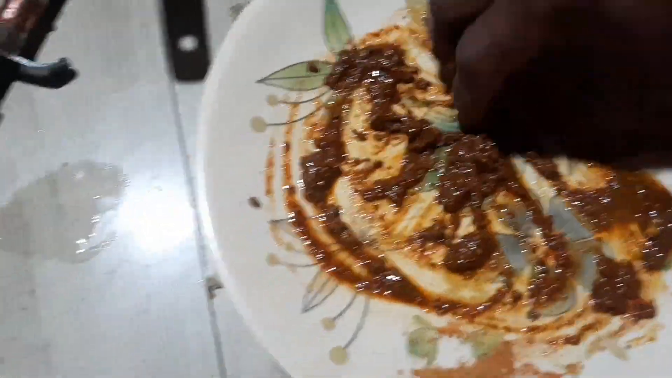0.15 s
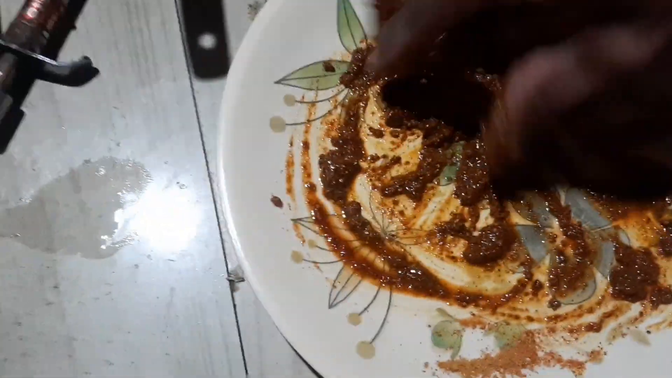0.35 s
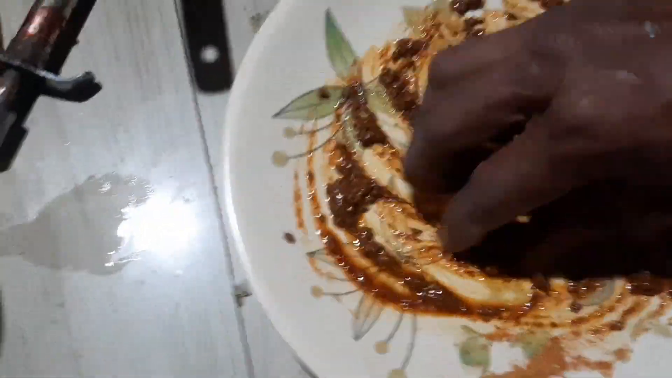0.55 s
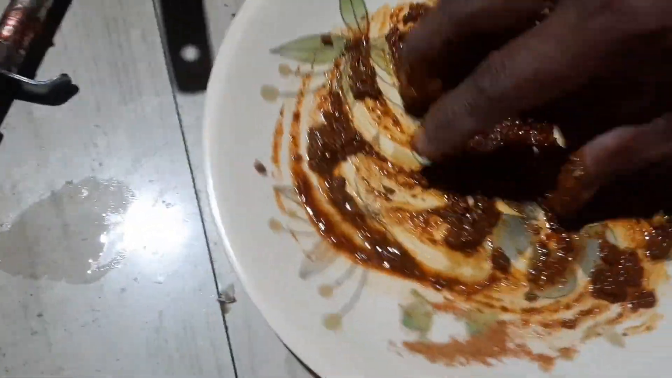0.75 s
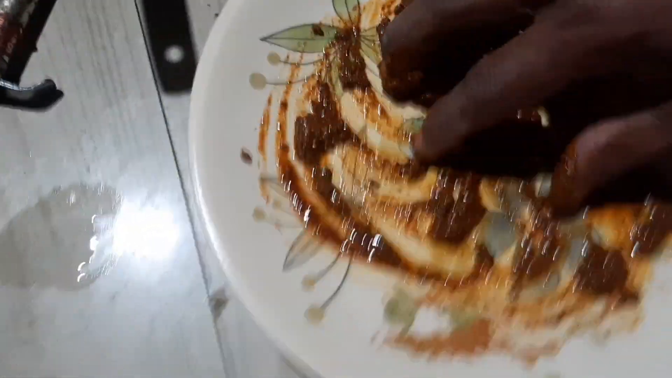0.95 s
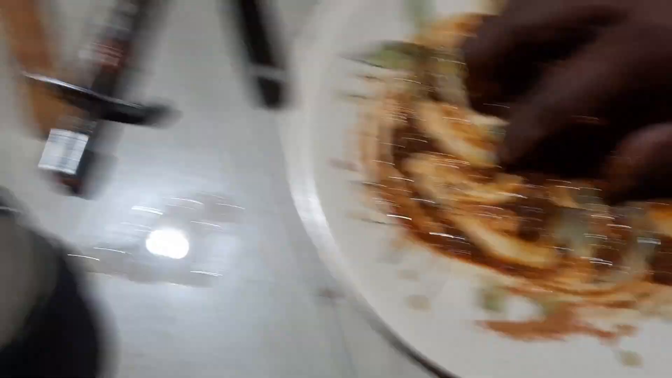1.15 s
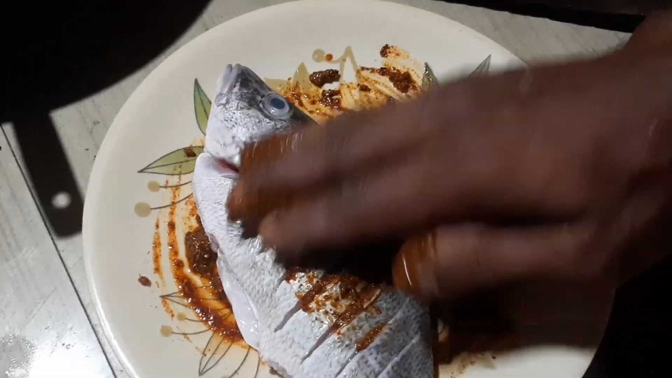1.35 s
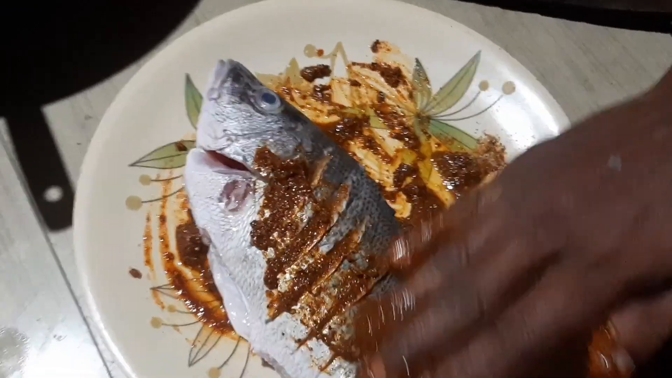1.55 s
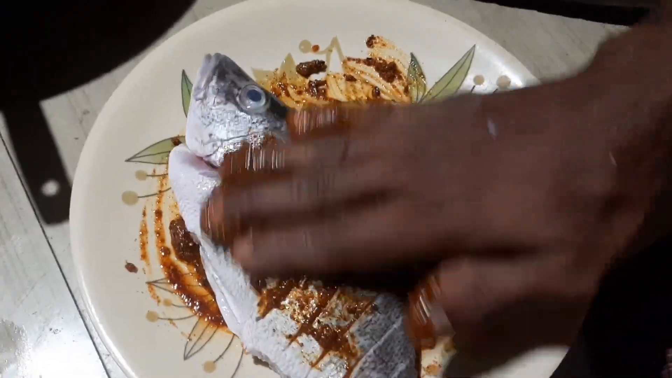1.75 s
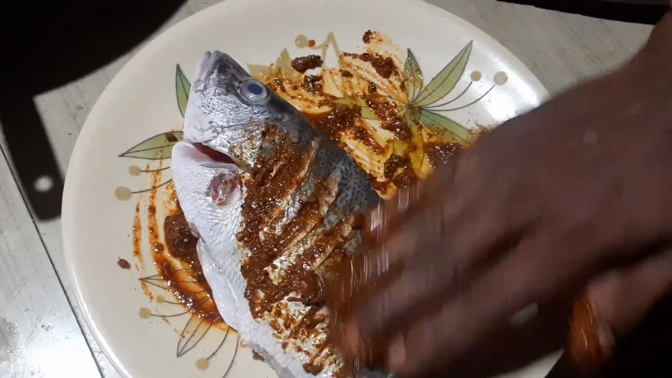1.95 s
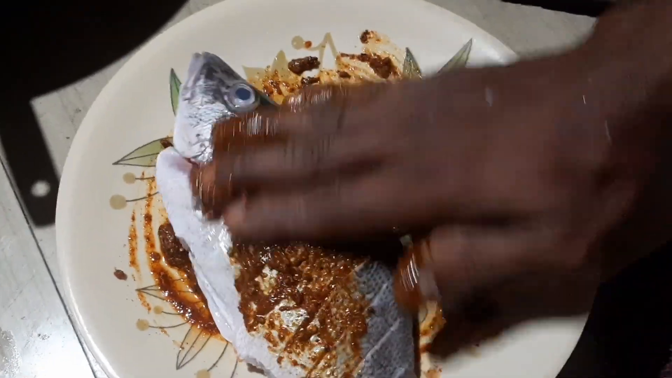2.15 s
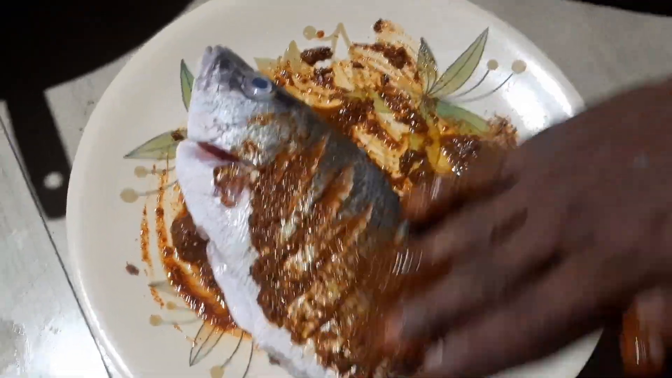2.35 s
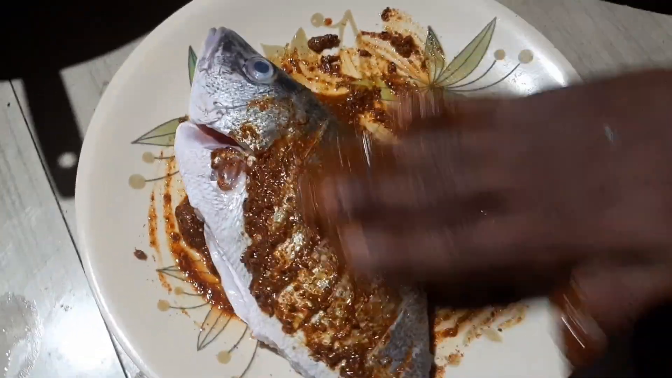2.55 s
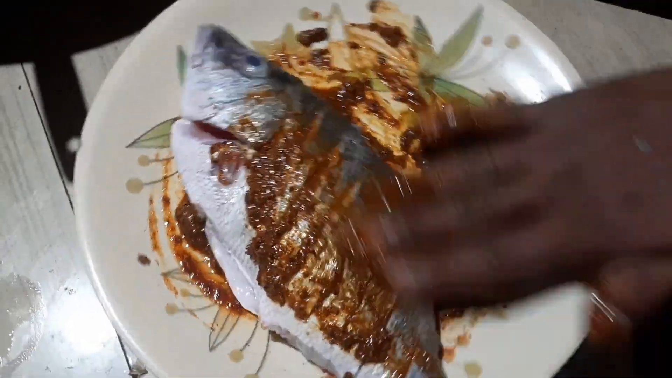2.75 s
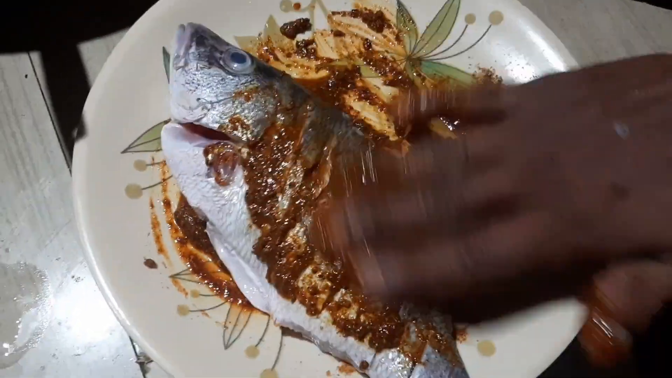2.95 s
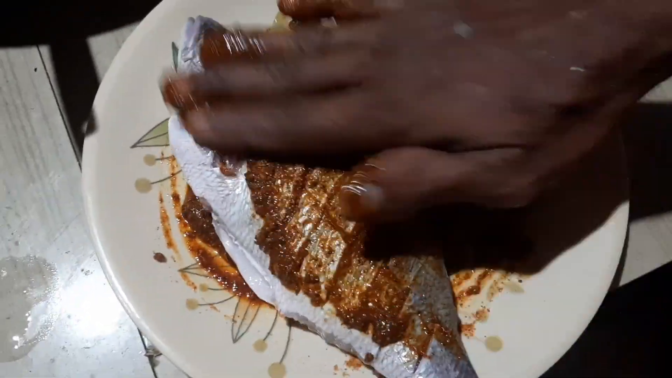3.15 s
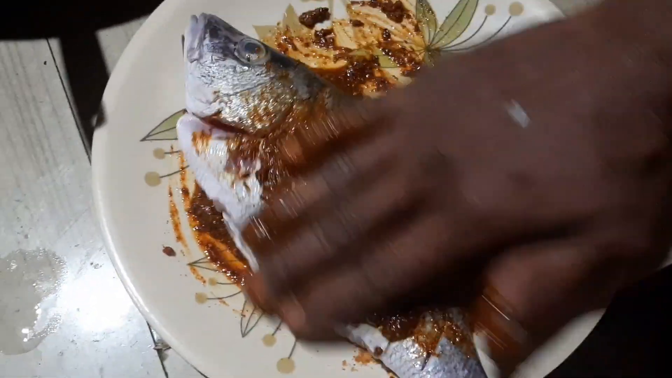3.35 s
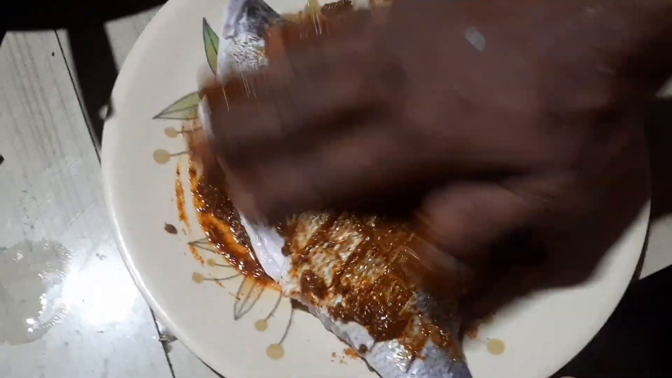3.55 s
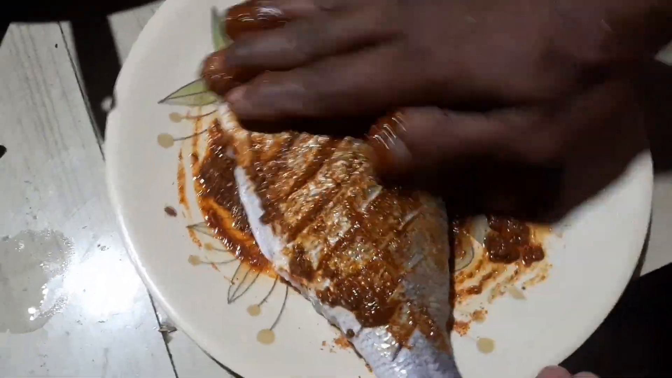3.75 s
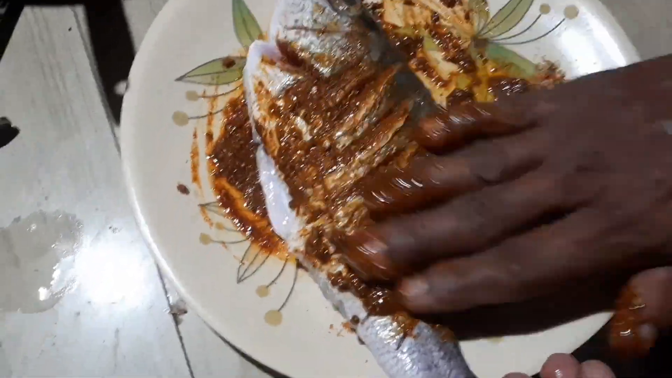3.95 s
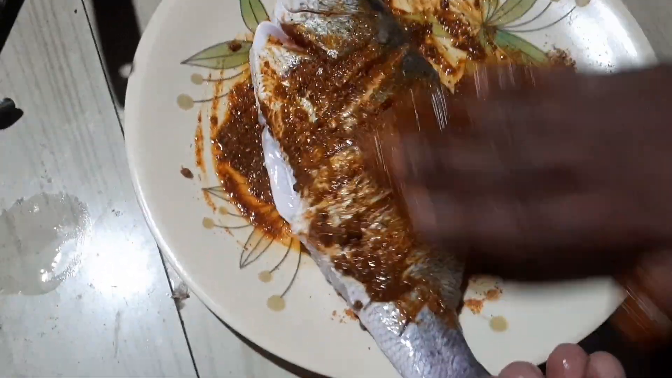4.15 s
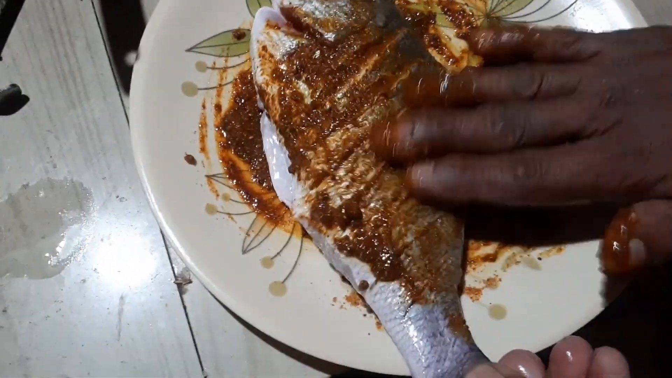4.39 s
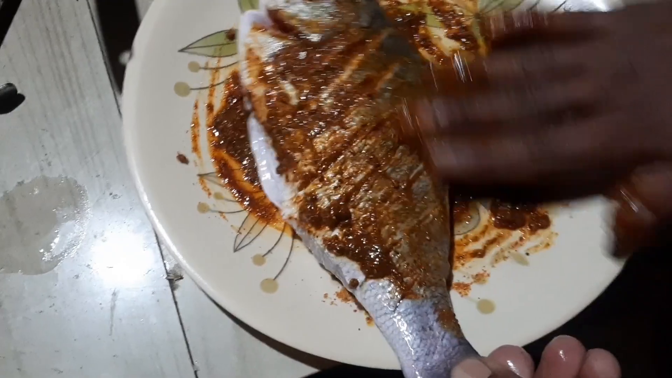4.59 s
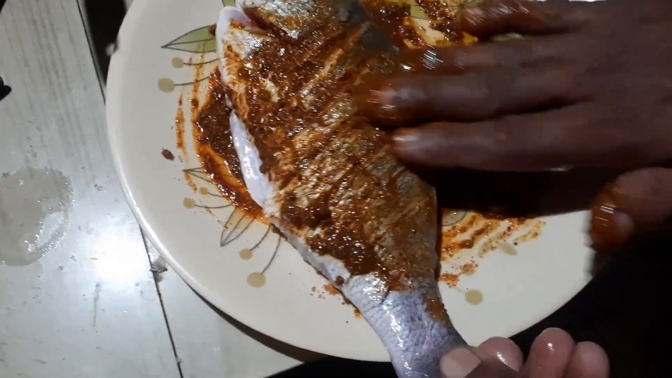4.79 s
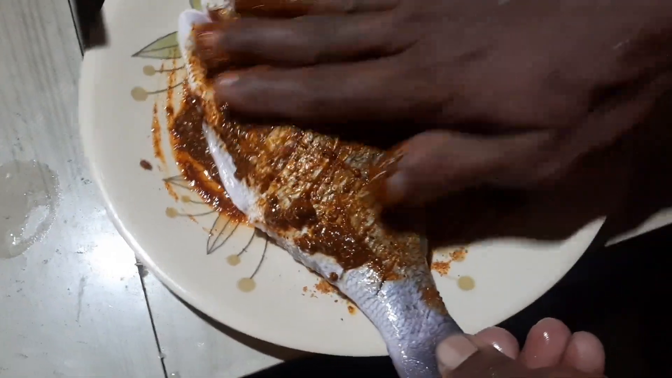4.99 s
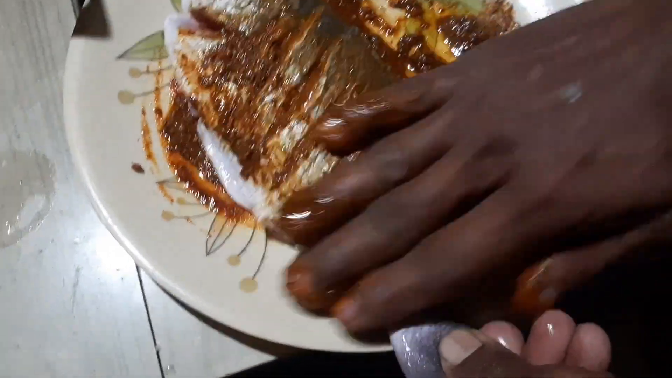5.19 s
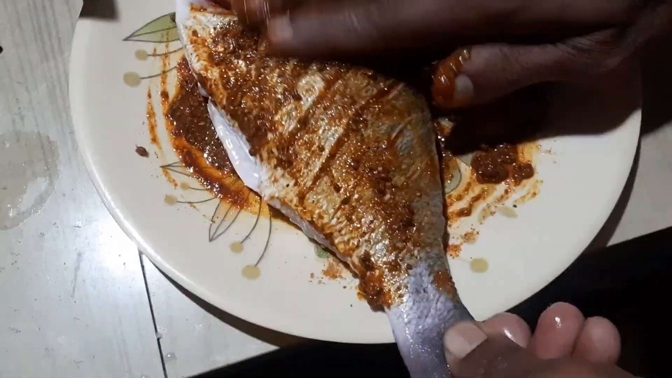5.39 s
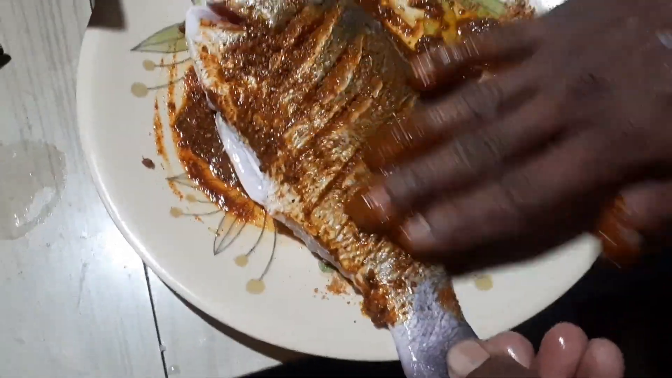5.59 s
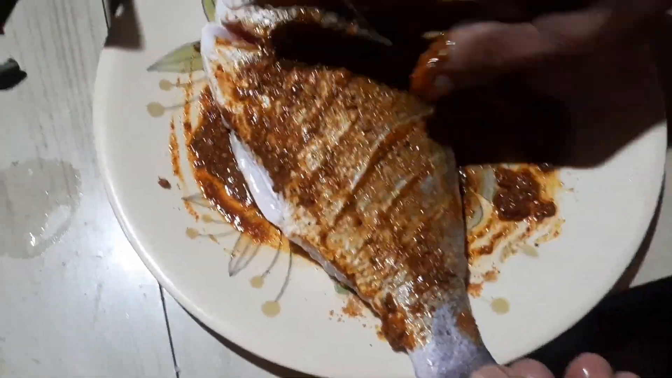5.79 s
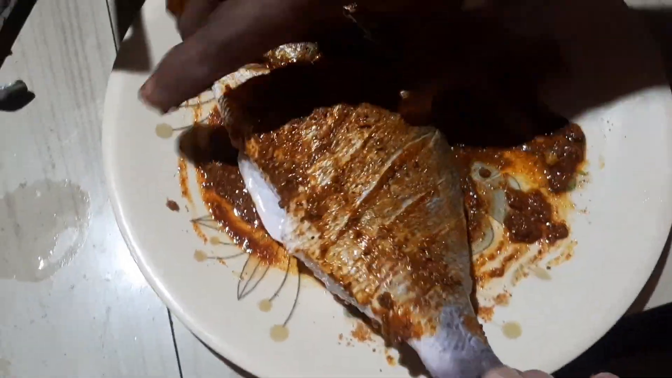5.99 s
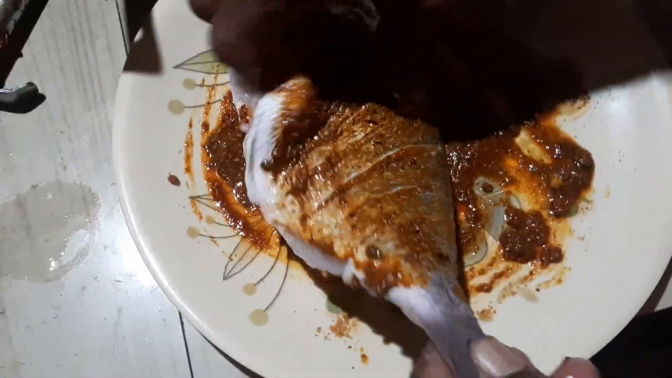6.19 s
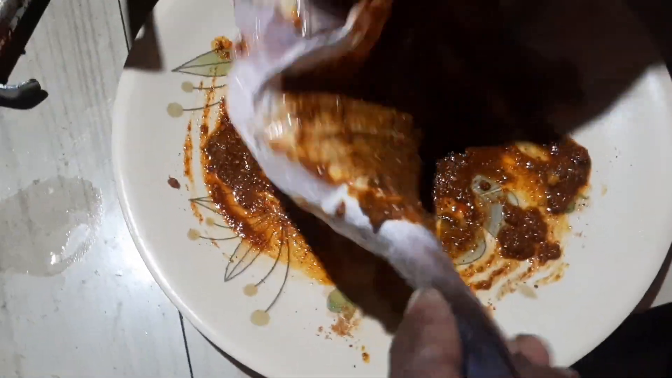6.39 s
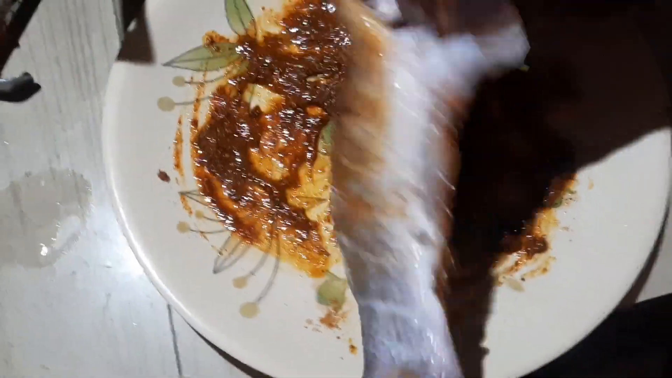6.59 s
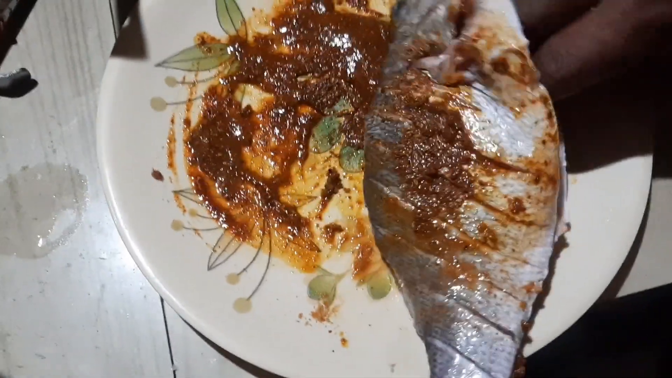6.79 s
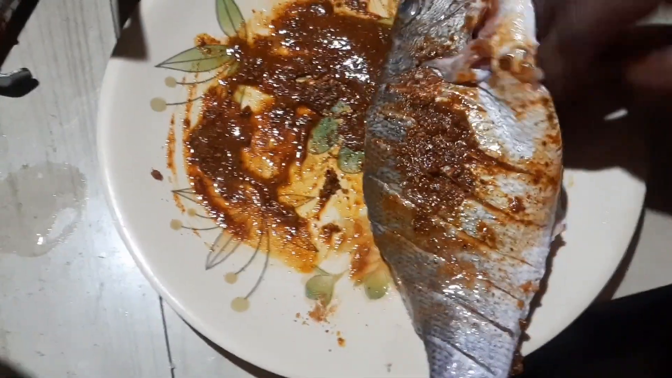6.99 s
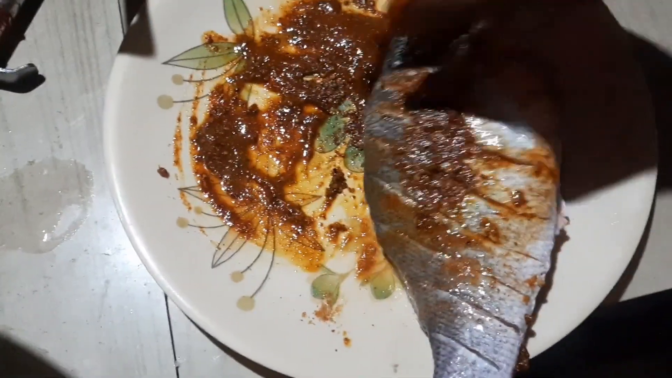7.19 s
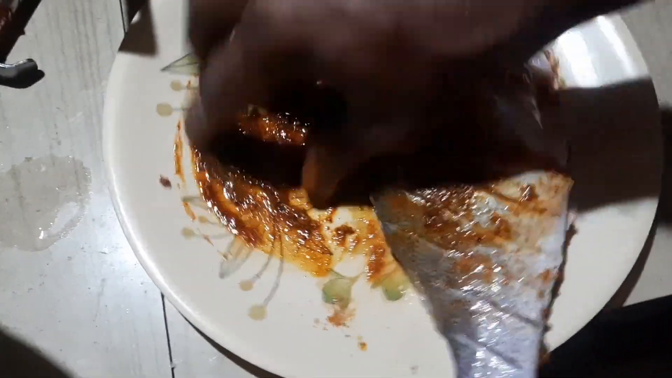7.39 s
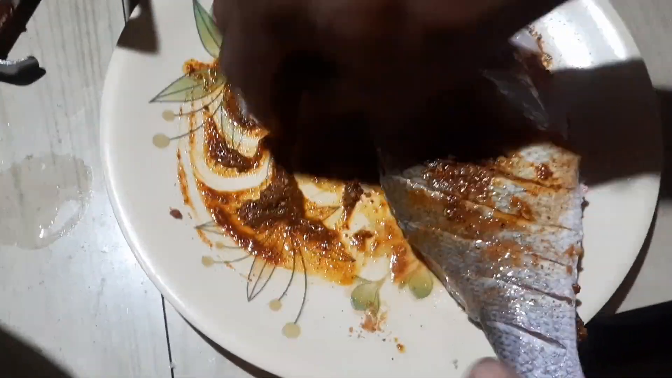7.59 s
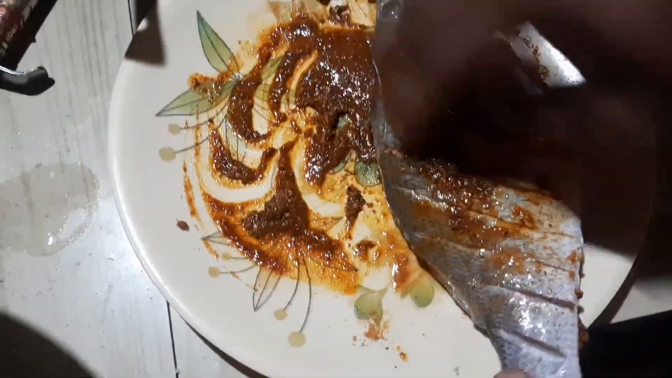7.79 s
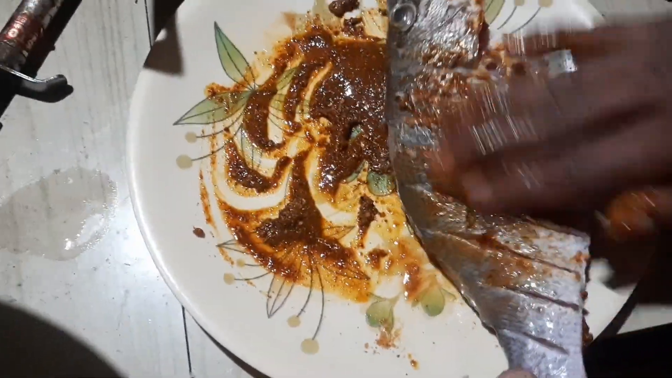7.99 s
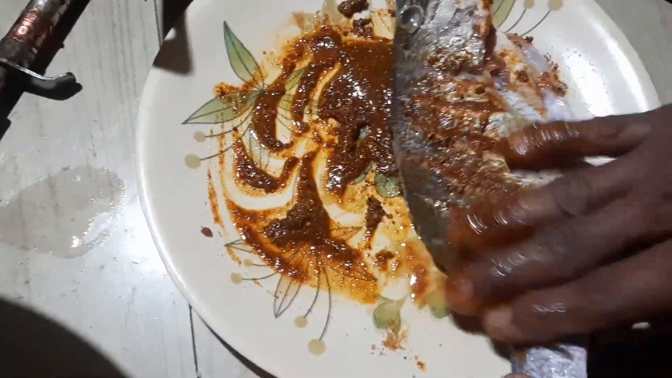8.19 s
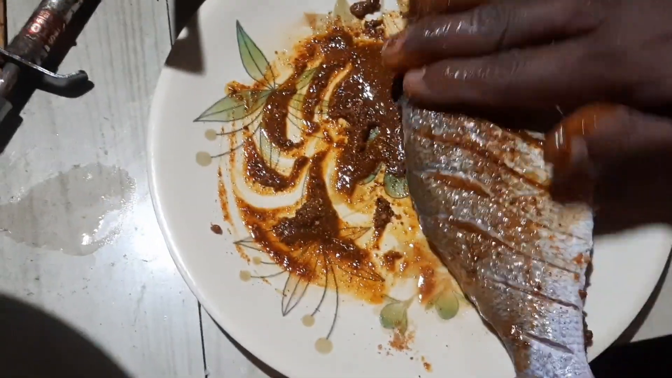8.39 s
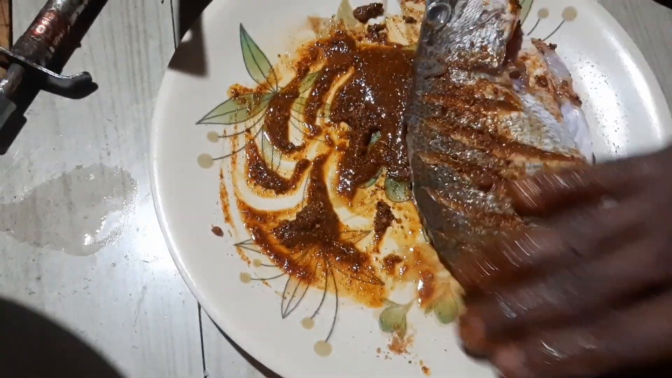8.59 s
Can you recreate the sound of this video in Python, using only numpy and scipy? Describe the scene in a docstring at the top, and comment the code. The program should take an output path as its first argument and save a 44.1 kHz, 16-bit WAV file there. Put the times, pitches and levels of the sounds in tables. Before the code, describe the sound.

Close, sticky rubbing and squishing of thick paste on fish, small bubble pops, ceramic taps and scrapes, in a quiet small kitchen.

```python
"""Small kitchen: fingers mix wet spice paste on a ceramic plate and rub it over a fish, close to a phone.
Each stroke tears tiny films of paste (crackle: resonant clicks) and squeezes air pockets (squelch: low clicks).
Larger bubbles pop, hollows under the palm gulp, skin ticks as it peels off the plate, the palm slaps once.
The loaded plate knocks (decaying modes) and drags (stick-slip clicks), most when the fish is turned over.
The counter shudders and booms under shifting weight; an appliance hums in steady air noise behind."""
import sys
import numpy as np
from scipy import signal
from scipy.fft import rfft, irfft, next_fast_len
from scipy.io import wavfile
from scipy.ndimage import uniform_filter1d, map_coordinates

SR = 44100
rng = np.random.default_rng(int(sys.argv[2]) if len(sys.argv) > 2 else 0)


def to_wav(sig):
    """Store sig (one row per channel, or 1-D mono) as 16-bit WAV at the path in sys.argv[1].

    Samples outside -1..1 are clipped; the rate is SR.
    """
    pcm = np.clip(np.atleast_2d(sig), -1, 1) * 32767
    pcm = np.round(pcm).astype(np.int16)
    wavfile.write(sys.argv[1], SR, pcm.T)  # frames by channels


N = 381024
TIME = np.arange(N) / SR

# spectrum of tearing paste films: (frequency [Hz], gain [dB])
TEAR_COLOUR = [(1500, -34), (2600, -19), (3800, -11), (5400, -8), (7200, -6), (8500, -18), (10000, -12),
               (12500, -7.5), (16000, -11)]
# spectrum of a hard contact: (frequency [Hz], gain [dB])
CRACK_COLOUR = [(500, -12.5), (1300, 3.5), (2300, 9.5), (3200, 6), (4100, 0.5), (6500, -8), (8300, -17.5),
                (16000, -21)]
# spectrum of a dull thump: (frequency [Hz], gain [dB])
THUMP_COLOUR = [(40, -17), (75, 3), (110, -4), (170, -0.5), (270, 7.5), (380, -1.5), (500, -6), (700, -4.5),
                (1100, -24.5), (2500, -51)]


def undb(db):
    """Decibels to gain."""
    return 10 ** (np.asarray(db) / 20)


def unit(x):
    """Scale to rms 1."""
    return x / np.sqrt(np.mean(x ** 2))


def fade(t, t60_s):
    """Exponential decay, 60 dB down at t60_s."""
    return np.exp(-np.log(1000) * t / t60_s)


def walk(rate_hz):
    """Smooth random wander of rms 1: rate_hz random values per second, smoothed."""
    hold = int(SR / rate_hz)
    steps = np.repeat(rng.standard_normal(N // hold + 1), hold)
    return unit(uniform_filter1d(steps, hold)[:N])


def colour(x, points):
    """Causal (minimum-phase) filter through (Hz, dB) points, built from the cepstrum."""
    size = next_fast_len(x.shape[-1] // 2 + 4096, True) * 2
    hz, db = np.transpose(points)
    bins_hz = np.maximum(np.fft.rfftfreq(size, 1 / SR), 1)
    gain = undb(np.interp(np.log(bins_hz), np.log(hz), db))
    cepstrum = irfft(np.log(gain))
    # fold the cepstrum onto positive times
    cepstrum[1:size // 2] *= 2
    cepstrum[size // 2 + 1:] = 0
    response = np.exp(rfft(cepstrum))
    return irfft(rfft(x, size) * response)[..., :x.shape[-1]]


def resonate(x, hz, width_hz):
    """Steep resonance: a two-pole band-pass applied twice; width_hz is that of one pass."""
    b, a = signal.iirpeak(hz, hz / width_hz, fs=SR)
    return signal.lfilter(b, a, signal.lfilter(b, a, x))


def steady(x, size):
    """Hold the short-term level near 1 over size samples; keep the finer grain."""
    power = uniform_filter1d(np.mean(x ** 2, axis=0), size=size)
    return x / np.sqrt(power + 1e-6)


def replay(x, speed):
    """Read a sound at a changing speed, which moves all its resonances together."""
    position = np.cumsum(speed)
    return np.array([map_coordinates(port, [position], order=1, mode="wrap") for port in x])


def gain_curve(tables):
    """Gain over time from spans of (s, dB, ..), fading to silence between them."""
    gain = 0
    for rows in tables:
        s, db = np.transpose(rows)[:2]
        gain = gain + undb(np.interp(TIME, s, db, left=-150, right=-150))
    return uniform_filter1d(gain, size=600)


def pan(x, db):
    """Tilt the balance by db, left minus right."""
    return x * undb(np.array([[db], [-db]]) / 2)


def spread(mid, side, side_db):
    """Two ports hear a shared part and an opposed part."""
    return unit(mid + undb(side_db) * side * np.array([[1], [-1]]))


def noise(size, side_db):
    """White stereo noise of rms 1."""
    mid, side = rng.standard_normal((2, size))
    return spread(mid, side, side_db)


def add(out, s, sound):
    """Mix a sound in at time s."""
    start = max(int(s * SR), 0)
    out[:, start:start + sound.shape[1]] += sound[:, :N - start]


def ruptures(per_s, scatter_db, side_db):
    """Random clicks of unequal size and stereo balance, at a steady short-term level."""
    happens = rng.random(N) < per_s / SR
    sizes = undb(scatter_db * np.minimum(rng.exponential(size=N), 4.5)) * happens
    return steady(sizes * noise(N, side_db), size=3000)


def burst(t, hit_s, tail_s, tail_db, side_db):
    """Noise of a contact: a brief hit, then a weaker tail as the parts settle."""
    return noise(len(t), side_db) * (fade(t, hit_s) + undb(tail_db) * fade(t, tail_s))


def swell(rise_s, fall_s, edge_db=20, roundness=1.265):
    """Pressure of one contact, edge_db down at rise_s and fall_s from its peak; returns (peak delay [s], curve)."""
    lead_s = 2 * rise_s
    t = np.arange(-lead_s, 2 * fall_s, 1 / SR)
    away = np.where(t < 0, -t / rise_s, t / fall_s)
    # roundness 1 is pointed, 2 a bell
    return lead_s, undb(-edge_db * away ** roundness)


def hand(dab_attack_s=0.0077, resting_crackle_db=-83, resting_squelch_db=-91):
    """Each contact drives crackle and squelch with one swell of pressure; overlapping fingers add in power."""
    # strokes through the paste: (firmest at [s], rise [s], fall [s], crackle [dB], squelch [dB])
    strokes = [(0.095, 0.093, 0.14, -46, -44), (0.555, 0.2, 0.13, -50.5, -47.5),
               (0.815, 0.19, 0.083, -63, -56.5), (1.31, 0.14, 0.11, -68.5, -67),
               (1.72, 0.11, 0.067, -58, -70.5), (1.87, 0.13, 0.12, -52, -65.5),
               (2.06, 0.094, 0.13, -56, -83), (2.2, 0.26, 0.19, -61, -69),
               (2.31, 0.11, 0.071, -49.5, -54.5), (2.5, 0.21, 0.085, -57.5, -69),
               (2.645, 0.092, 0.047, -50, -58), (2.82, 0.16, 0.084, -54.5, -61),
               (3.17, 0.1, 0.048, -45.5, -54), (3.28, 0.069, 0.14, -41.5, -41.5),
               (3.42, 0.13, 0.11, -41, -44.5), (3.6, 0.065, 0.051, -55.5, -58.5),
               (3.77, 0.14, 0.18, -55, -54), (3.9, 0.046, 0.12, -50, -63.5),
               (4.115, 0.057, 0.032, -52, -65), (4.21, 0.047, 0.063, -52, -62),
               (4.4, 0.11, 0.072, -60.5, -70.5), (4.635, 0.095, 0.084, -69.5, -64.5),
               (4.99, 0.045, 0.062, -55.5, -61.5), (5.06, 0.073, 0.074, -71, -59.5),
               (5.13, 0.15, 0.22, -55.5, -67.5), (5.28, .1, .1, -77, -61.5),
               (5.38, 0.12, 0.095, -50, -64.5), (5.535, 0.034, 0.075, -48.5, -68),
               (5.705, 0.064, 0.049, -48.5, -69), (6.135, 0.22, 0.1, -61, -51.5),
               (6.34, 0.24, 0.087, -61, -58), (6.57, 0.12, 0.034, -63, -60),
               (6.735, 0.055, 0.16, -58.5, -52.5), (7.47, 0.12, 0.37, -62, -53),
               (7.91, 0.072, 0.1, -58.5, -63.5), (8.02, 0.052, .11, -53.5, -56),
               (8.18, 0.058, 0.047, -46.5, -56), (8.355, 0.089, 0.07, -46.5, -67),
               (8.405, 0.11, 0.11, -72, -49), (8.59, 0.17, 0.075, -51.5, -69)]
    # dabs, fingers landing or coming unstuck at once: (time [s], fall [s], crackle [dB], squelch [dB])
    dabs = [(0.305, 0.061, -56, -62), (0.711, 0.035, -62, -58), (1.149, 0.19, -61, -92),
            (1.492, 0.1, -50.5, -65), (2.74, 0.16, -65, -55.5), (3.308, 0.15, -42, -38.5),
            (4.475, 0.063, -61, -67), (4.925, 0.042, -57.5, -64.5), (5.495, 0.05, -50.5, -65),
            (5.869, 0.014, -82, -41), (6.604, 0.015, -48, -71), (6.666, 0.05, -49, -47.5),
            (7.084, 0.28, -63.5, -71.5), (7.254, 0.053, -59.5, -72), (7.337, 0.054, -58, -49),
            (7.364, 0.46, -52, -51), (7.772, 0.035, -54.5, -58.5)]
    contacts = strokes + [(s, dab_attack_s, *rest) for s, *rest in dabs]
    # the hand lying still in the paste
    resting = undb([resting_crackle_db, resting_squelch_db])
    power = np.outer(resting ** 2, np.ones(N))
    for s, rise_s, fall_s, crackle_db, squelch_db in contacts:
        lead_s, pressure = swell(rise_s, fall_s)
        # drop what precedes time 0
        early = max(int((lead_s - s) * SR), 0)
        gains = np.outer(undb([crackle_db, squelch_db]), pressure[early:])
        add(power, s - lead_s, gains ** 2)
    return np.sqrt(power)


def crackle(gain, darken=0.1, light_db=-59):
    """Clusters of paste films tear under the fingers, at several pitches, over the hiss of wet skin."""
    # small to smaller tearing films: pitch [Hz]
    tears_hz = [5200, 8120, 11550, 13600]
    tearing = 0
    for hz in tears_hz:
        clicks = ruptures(per_s=520, scatter_db=3.0, side_db=2.5)
        tearing = tearing + unit(resonate(clicks, hz, 0.35 * hz))
    clusters = unit(tearing) * undb(5.7 * walk(90))
    hiss = undb(1.0) * noise(N, side_db=-5.5)
    rub = steady(colour(clusters + hiss, TEAR_COLOUR), size=3600)
    # a hand that presses harder covers the finest fizz
    fizz = signal.sosfiltfilt(signal.butter(3, 8800, "high", fs=SR, output="sos"), rub)
    fizz_gain = (gain / undb(light_db)) ** -darken
    return gain * (rub + fizz * (fizz_gain - 1))


def squelch(gain, stretch=.09):
    """Trapped air is squeezed out in a run of low clicks; pockets change size, so their resonances wander."""
    # resonances of the air pockets: (frequency [Hz], gain [dB])
    pocket_colour = [(60, -39), (200, -7), (500, -4), (850, -18), (1150, 2.5), (1350, -5), (1550, 7),
                     (1780, -5), (2050, 2), (2600, -2), (4200, 0.5), (5800, -15), (9000, -49)]
    clicks = ruptures(per_s=920, scatter_db=1.1, side_db=3) * undb(4.9 * walk(60))
    pockets = replay(colour(clicks, pocket_colour), np.exp(stretch * walk(14)))
    return gain * steady(pockets, size=2400)


def slap(slap_s=3.3087, splat_db=-29, thud_db=-46, hit_t60_s=0.013, tail_t60_s=.24):
    """The palm lands flat on the wet fish: a gritty splat of paste over a dull thud, both dying away."""
    out, t = np.zeros((2, N)), TIME[:SR // 2]
    grit = noise(len(t), side_db=0) * undb(2 * walk(400)[:len(t)])
    # levels ahead of the decay
    splat = undb(splat_db) * unit(colour(grit, CRACK_COLOUR))
    thud = undb(thud_db) * unit(colour(noise(len(t), side_db=-10), THUMP_COLOUR))
    decay = 2 * fade(t, hit_t60_s) + fade(t, tail_t60_s)
    add(out, slap_s, (splat + thud) * decay)
    return pan(out, db=-0.5)


def pops(bubble_db=-3, snap_db=-1):
    """A larger bubble bursts with a snap, coloured by its own size."""
    # single bubbles and smacks of paste: (time [s], level [dB], pitch [Hz])
    bubbles = [(2.8724, -36, 12100), (2.9503, -34, 5360), (2.9637, -23.5, 5300), (2.967, -23.5, 4200),
               (3.205, -30.5, 5100), (3.49, -33, 5800), (3.8477, -37, 5440), (3.902, -34, 5100),
               (4.145, -41, 6230), (4.2105, -31, 6860), (4.4765, -37, 9000), (5.162, -39, 7500),
               (5.4792, -40, 12600), (5.5478, -33, 6150), (5.5564, -35, 12500), (5.681, -40.5, 7200),
               (6.6635, -34, 3120), (7.5175, -25.5, 6200), (7.5215, -37, 6800), (7.5801, -16, 5880),
               (7.91, -40.5, 7400)]
    out, t = np.zeros((2, N)), TIME[:2048]
    for s, db, hz in bubbles:
        tear = burst(t, hit_s=.004, tail_s=.03, tail_db=-15, side_db=-2)
        snap = colour(tear, TEAR_COLOUR)
        bubble = resonate(tear, hz, hz / 3)
        snap *= undb(db + snap_db) / np.abs(snap).max()
        bubble *= undb(db + bubble_db) / np.abs(bubble).max()
        add(out, s, snap + bubble)
    return out


def gulps(length_s=0.017, overtone_db=-4):
    """A hollow between palm and fish swells and closes; wet clicks ring its two resonances, which glide."""
    # hollows under the palm: (centre time [s], level [dB], cavity pitch [Hz], glide [octaves/s])
    hollows = [(2.22, -68.5, 1080, 1.5), (3.185, -49, 990, -1.5), (3.26, -62, 1050, 4.5),
               (3.482, -50.5, 847, -2), (3.6, -59, 1020, 5), (3.75, -56.5, 974, 3.5),
               (3.809, -65, 1020, -2.5), (3.87, -63, 1130, 0.5), (5.407, -61, 1040, 1),
               (5.749, -69, 1080, -3)]
    out, t = np.zeros((2, N)), TIME[:SR // 5]
    late = t - t.mean()
    bell = np.exp(-(late / length_s) ** 2 / 2)
    size = 2 * len(t)
    for s, db, hz, glide in hollows:
        clicks = noise(size, side_db=-3.5) * (rng.random(size) < 900 / SR)
        width_hz = hz / 6
        cavity = unit(resonate(clicks, hz, width_hz))
        overtone = unit(resonate(clicks, 2 * hz, width_hz))
        gliding = replay(cavity + undb(overtone_db) * overtone, 2 ** (glide * late))
        add(out, s - t.mean(), undb(db) * bell * gliding)
    return out


def ticks(tail_s=0.037):
    """Skin comes unstuck from the plate with a short, dull, pitched tick."""
    # sticky ticks: (time [s], peak [dB], pitch [Hz])
    peels = [(4.903, -52, 1510), (6.127, -38, 1730), (6.2762, -39, 1470), (6.891, -41.5, 1620),
             (6.933, -48, 1550), (6.975, -46, 1590), (7.209, -46, 2000), (8.005, -40, 1840)]
    out, t = np.zeros((2, N)), TIME[:SR // 8]
    for s, db, hz in peels:
        contact = burst(t, hit_s=.006, tail_s=tail_s, tail_db=-6, side_db=0)
        tear = resonate(contact, hz, hz / 2)
        add(out, s, undb(db) * tear / np.abs(tear).max())
    return out


def knocks(focus_octaves=0.46, thump_s=0.27, soak_t60_s=0.037):
    """The plate taps the counter: a crack, its modes (strongest near that spot's pitch) and a counter thump."""
    # taps: (time [s], ring [dB], thump [dB], crack [dB], strongest ring [Hz],
    #        part of the ring that the load lets sound on [dB], left minus right [dB])
    taps = [(0.0724, -57, -51, -60, 1250, 4, -2.5), (0.2994, -64, -68, -64.5, 1540, 9, -2),
            (0.3409, -66, -65.5, -68, 1530, 4, -4), (0.5129, -61, -52.5, -82, 1580, -1, -3),
            (0.5441, -69, -56, -59, 1880, -8, -1), (0.6428, -73, -60, -87, 1540, -6, 2),
            (0.712, -59, -62.5, -57, 1640, -6, -2.5), (0.8053, -71, -64, -63.5, 1570, -14, -3),
            (2.599, -68, -77, -67, 1790, -10, 0), (5.8683, -60.5, -65, -67.5, 1750, -18, -5),
            (5.9542, -68.5, -66, -68.5, 1390, -16, -2), (6.3923, -46, -63, -50.5, 1920, -13, -3),
            (6.4063, -45.5, -47.5, -48.5, 1550, -20, -2), (6.5004, -61.5, -62, -66.5, 1595, -22, 0),
            (6.7335, -52, -52, -49.5, 1297, -26, -2.5), (7.3654, -64.5, -63, -62, 1540, -7, -4),
            (7.435, -60, -53.5, -60, 1330, -18, -2), (7.5793, -46.5, -50, -41.5, 2420, -9, -2.5),
            (7.594, -53, -66, -64, 2450, 14, 4)]
    # modes of the plate damped by fish and hand: (frequency [Hz], level [dB], t60 [s])
    plate_modes = [(1058, 0.5, 0.01), (1272, 3, 0.054), (1540, 5.5, 0.05), (2000, -11.5, 0.04),
                   (2018, 4, 0.073), (2322, -4.5, 0.13), (2455, -11, 0.18), (2635, -3, 0.22)]
    out, t = np.zeros((2, N)), TIME[:SR // 3]
    mode_hz, mode_db, t60_s = np.transpose(plate_modes)[:, :, None]
    for s, ring_db, thump_db, crack_db, hz, free_db, pan_db in taps:
        octaves_off = np.log2(mode_hz / hz)
        weight = undb(mode_db) / (1 + (octaves_off / focus_octaves) ** 2)
        detune = 1 + 0.0137 * rng.standard_normal(mode_hz.shape)
        # every mode reaches the two ports with its own phase
        phase = rng.uniform(0, 2 * np.pi, mode_hz.shape)
        phase = phase + .8 * rng.standard_normal((2, *mode_hz.shape))
        # the soft load soaks up part of the ring at once
        decay = fade(t, soak_t60_s) + undb(free_db) * fade(t, t60_s)
        modes = weight * np.sin(2 * np.pi * mode_hz * detune * t + phase) * decay
        ring = undb(ring_db) * unit(np.sum(modes, axis=1))
        hit = burst(t, hit_s=.015, tail_s=.055, tail_db=-15, side_db=0)
        crack = undb(crack_db) * unit(colour(hit, CRACK_COLOUR))
        push = burst(t, hit_s=.018, tail_s=thump_s, tail_db=-11, side_db=-10)
        thump = undb(thump_db) * unit(colour(push, THUMP_COLOUR))
        add(out, s, pan(ring + crack + thump, pan_db))
    return out


def drag():
    """The plate's foot sticks and slips over the counter; the groan rises in pitch as it gathers speed."""
    # spans of dragging: (time [s], level [dB], resonance pitch [share of that at full speed])
    drags = [
        [(0.36, -65.5, 0.73), (0.524, -50.5, .95), (0.764, -62, 0.94), (0.878, -54, 1), (1.3, -77, 0.92)],
        [(5.9, -76, 0.36), (6.11, -51, 0.99), (6.26, -57, 1), (6.35, -58.5, .6), (6.42, -57, .95),
         (6.56, -50, 0.99), (6.7, -61.5, 1)],
    ]
    # resonances excited at full speed: (frequency [Hz], width of one pass [Hz], level [dB])
    foot_modes = [(376, 240, -6.5), (463, 63, -1.5), (720, 185, -3), (910, 540, -2)]
    slips = ruptures(per_s=1100, scatter_db=-2.0, side_db=-3.0)
    body = 0
    for hz, width_hz, db in foot_modes:
        body = body + undb(db) * unit(resonate(slips, hz, width_hz)) * undb(2 * walk(6.1))
    body = signal.sosfilt(signal.butter(4, 900, fs=SR, output="sos"), body)
    s, _, pitch = np.concatenate(drags).T
    groan = steady(replay(body, np.interp(TIME, s, pitch)), size=3000)
    return pan(groan * gain_curve(drags), db=-2.5)


def shudder(boom_hz=75, boom_t60_s=0.34):
    """The counter top rumbles softly as weight shifts on it, and swings in its lowest mode as weight lands."""
    # spans of rumble under the hand's weight: (time [s], level [dB])
    shudders = [
        [(0.0, -51.5), (0.084, -60.5), (0.186, -65.5), (0.484, -61), (0.504, -53), (0.886, -58.5), (1.05, -87)],
        [(5.85, -72), (5.952, -55), (6.07, -68), (6.336, -67), (6.41, -49), (6.586, -63), (6.8, -53),
         (7.0, -78)],
    ]
    # weight landing: (time [s], level ahead of the envelope [dB])
    booms = [(0.641, -45), (6.754, -42)]
    # spectrum of the rumble: (frequency [Hz], gain [dB])
    counter_colour = [(45, -0.5), (75, 4.5), (95, -16), (145, 8), (200, -2), (320, -5.5), (600, -11),
                      (1200, -99)]
    t = TIME[:SR // 2]
    out = unit(colour(noise(N, side_db=-32), counter_colour)) * gain_curve(shudders)
    envelope = fade(t, boom_t60_s) * (1 - fade(t, .05))
    swing = np.sin(2 * np.pi * boom_hz * t) * envelope
    for s, db in booms:
        add(out, s, undb(db) * swing[None])
    return pan(out, db=-3.5)


def kitchen(air_db=-65):
    """Steady air noise, alike at both ports in the bass, with the hum and whine of an appliance."""
    # spectrum of the air noise: (frequency [Hz], gain [dB])
    air_colour = [(50, -1), (100, -7), (145, -5), (200, -3), (330, -0.5), (450, -5.5), (640, -9),
                  (850, -20.5), (2300, -33), (5200, -24), (9300, -38.5), (13000, -27), (16000, -20)]
    # appliance hum and whine: (frequency [Hz], width of one pass [Hz], level [dB])
    hum_bands = [(144, 17.3, -72), (328.9, 21.5, -72), (618.4, 12.5, -77.5), (1509, 110, -84.5),
                 (3110, 310, -72)]
    mid, side = colour(rng.standard_normal((2, N)), air_colour)
    side = signal.sosfilt(signal.butter(1, 450, "high", fs=SR, output="sos"), side)
    air = spread(mid, side, side_db=-2.0) * undb(air_db + 1.1 * walk(20.0))
    hum = 0
    for hz, width_hz, db in hum_bands:
        hum = hum + undb(db) * unit(resonate(noise(N, side_db=-5.0), hz, width_hz))
    return pan(air + hum, db=-4.5)


def room(x, wet_db, t60_s=0.23):
    """Close hard walls give a short tail, different at each port."""
    t = TIME[:SR // 2]
    onset = 1 - np.exp(-(t / .004) ** 2)
    tail = rng.standard_normal((2, len(t))) * fade(t, t60_s) * onset
    tail = colour(tail, [(120, -26.0), (500, -1), (2400, 0.5), (7000, -3), (16000, -5.5)])
    tail /= np.sqrt(np.sum(tail ** 2) / 2)
    return x + undb(wet_db) * signal.oaconvolve(x, tail, axes=1)[:, :N]


def scene():
    """Paste, plate and counter in the kitchen."""
    rubbing, pressing = hand()
    films = pan(crackle(rubbing) + pops(), db=-2)
    pockets = pan(squelch(pressing) + gulps() + ticks(), db=-1.0)
    paste = room(films + pockets + slap(), wet_db=-6.5)
    plate = room(knocks() + drag(), wet_db=-7)
    return paste + plate + shudder() + kitchen()


def record(dry, bass_cut_hz=40, top_hz=15900):
    """The two microphone ports colour the sound oppositely; the phone cuts the deep bass and the top."""
    tilt = [(100, 0.5), (350, -1.83), (2000, -0.11), (5000, -0.68), (7000, -1.6), (9000, 2.3), (15000, 0.87)]
    opposite = [(hz, -db) for hz, db in tilt]
    ports = np.array([colour(dry[0], tilt), colour(dry[1], opposite)])
    ports = signal.sosfilt(signal.butter(8, bass_cut_hz, "high", fs=SR, output="sos"), ports)
    return signal.sosfilt(signal.ellip(10, .2, 80, top_hz, fs=SR, output="sos"), ports)


dry = scene()
out = record(dry)
to_wav(out)
```